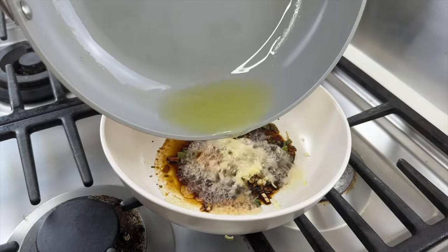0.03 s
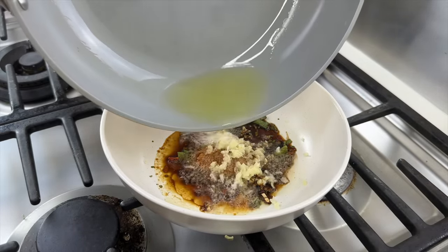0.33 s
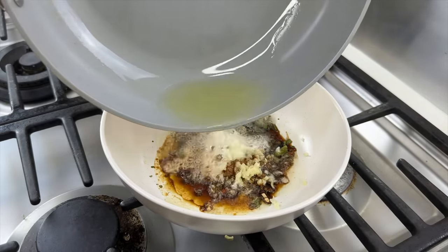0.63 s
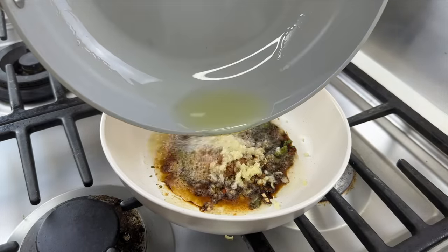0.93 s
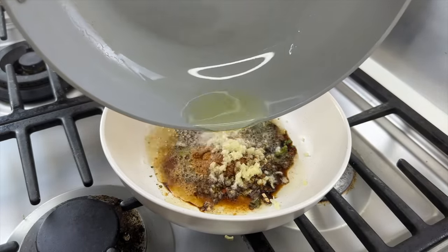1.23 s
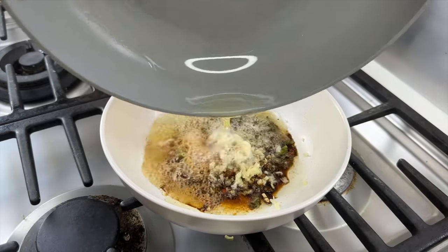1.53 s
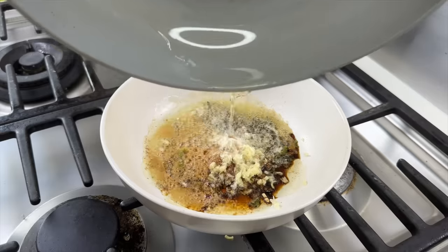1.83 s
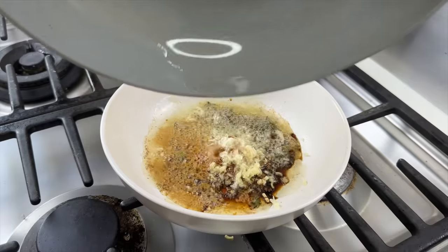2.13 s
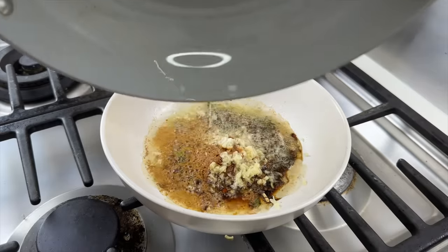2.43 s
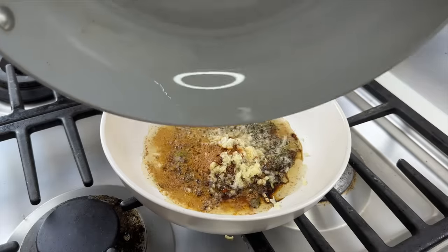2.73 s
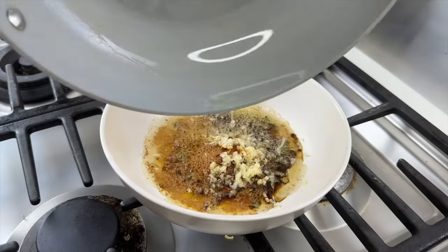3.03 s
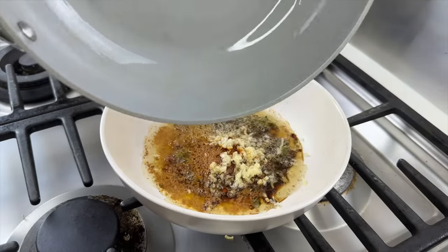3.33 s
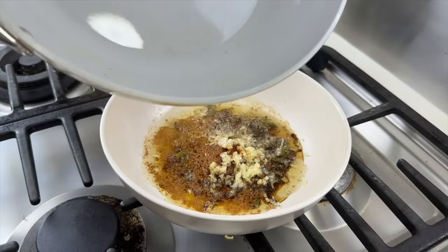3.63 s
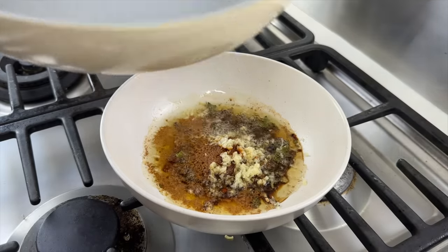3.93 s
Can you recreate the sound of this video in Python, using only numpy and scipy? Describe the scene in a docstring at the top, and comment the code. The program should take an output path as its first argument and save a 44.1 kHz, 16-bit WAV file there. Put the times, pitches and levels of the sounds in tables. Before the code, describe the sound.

A sharp sizzle of poured hot oil, spitting and popping, then fizzing more softly.

```python
"""Hot oil is poured from a pan over seasonings in a ceramic bowl, in a kitchen where an appliance hums.
At once water flashes to steam in tiny bursts: a high fizz and a crackle, then a swelling coarse sputter.
The bowl's resonances colour all three, and the gap under the tipping pan colours the lower two.
Droplets spit in bright snaps; steam pockets pop, coloured by the bowl's resonances.
The sputter dies first, the pops thin out and the foam fizzes on."""
import sys
import numpy as np
from scipy import signal
from scipy.fft import rfft, irfft, next_fast_len
from scipy.io import wavfile
from scipy.ndimage import map_coordinates

SR = 44100
rng = np.random.default_rng(int(sys.argv[2]) if len(sys.argv) > 2 else 0)


def wrap_up_sound(samples):
    """Save the sound to the file named by the first command line argument, as 16-bit audio."""
    columns = np.atleast_2d(samples).T
    # keep every value between -1 and 1, then stretch to whole-number steps
    tamed = np.clip(columns, -1, 1)
    steps = np.round(tamed * 32767).astype(np.int16)
    wavfile.write(sys.argv[1], SR, steps)


N = 176400


def amp(db):
    """Amplitude ratio of a level in decibels."""
    return 10 ** (np.asarray(db) / 20)


def unit(x):
    """Normalisation to rms 1."""
    return x / np.sqrt(np.mean(x ** 2) + 1e-20)


def along(points, hz):
    """Interpolation of (frequency_hz, value) rows on a logarithmic frequency axis."""
    knots_hz, values = np.transpose(points)
    return np.interp(np.log(hz + 1), np.log(knots_hz + 1), values)


def curve(rows):
    """Linear interpolation of (time_s, value) rows, one value per sample."""
    return np.interp(np.arange(N) / SR, *np.transpose(rows))


def wobble(rate_hz):
    """Smooth random modulation: a spline through rate_hz Gaussian knots a second."""
    knots = rng.standard_normal(int(N * rate_hz / SR) + 4)
    return map_coordinates(knots, [np.arange(N) * rate_hz / SR])


def bell(hz, centre_hz, width_hz):
    """Lorentzian resonance curve, 1 at its centre."""
    return 1 / (1 + (2 * (hz - centre_hz) / width_hz) ** 2)


def filtered(x, response):
    """Linear filtering: the spectrum of x is multiplied by response(hz)."""
    size = 2 * next_fast_len(N // 2 + SR // 4)
    return irfft(rfft(x, size) * response(np.fft.rfftfreq(size, 1 / SR)), size)[..., :N]


def minimum_phase(db):
    """The causal response with these gains, obtained by folding the cepstrum."""
    cepstrum = irfft(np.log(amp(db)))
    half = len(cepstrum) // 2
    return np.exp(rfft(np.r_[cepstrum[0], 2 * cepstrum[1:half], np.zeros(half)]))


def add(track, start_s, sound):
    """Superposition of a sound on the track from start_s."""
    part = track[:, max(0, round(start_s * SR)):][:, :sound.shape[1]]
    part += sound[:, :part.shape[1]]


def widen(pair):
    """Partial coherence: mid and side become left and right, narrowing to nearly mono at 11-13 kHz."""
    # Left-right likeness: frequency_hz, coherence
    coherence = [(100, .97), (500, .75), (1600, .85), (2300, .78), (2900, .45), (4000, .58), (5500, .15),
                 (7000, .5), (8000, .82), (11100, .98), (13000, .97), (15000, .85)]

    def weights(hz):
        angle = np.arccos(np.clip(along(coherence, hz), -1, 1)) / 2
        return np.array([np.cos(angle), np.sin(angle)])

    mid, side = filtered(pair, weights)
    return np.array([mid + side, mid - side])


def appliance(air_db=-52):
    """A motor hums in two tones with slight phase modulation, over the broadband rumble of air."""
    # Motor tones: pitch_hz, level_db
    tones = [(96.3, -55), (127, -59.5)]
    # Spectrum of the air: frequency_hz, gain_db
    rumble = [(20, -21), (35, -13), (60, -0.5), (78, 0), (97, 0.5), (125, -1), (165, -6.5), (300, -15),
              (600, -20.5), (2000, -31)]
    t = np.arange(N) / SR
    hum = sum(amp(db) * np.sqrt(2) * np.sin(2 * np.pi * hz * t + .5 * wobble(4.6)) for hz, db in tones)
    air = unit(filtered(rng.standard_normal((2, N)), lambda hz: amp(along(rumble, hz))))
    return hum + amp(air_db) * widen(air)


def bowl_db(hz):
    """Cavity resonance: the gain in decibels that the hollow of the bowl gives each frequency."""
    # Peaks and one dip of the bowl: centre_hz, width_hz, gain_db
    resonances = [(300, 100, 1.5), (1560, 280, 7), (2310, 150, 2.5), (2730, 320, -5), (3080, 220, 4.5),
                  (3730, 380, 3.5), (6060, 300, 1)]
    return sum(db * bell(hz, centre, width) for centre, width, db in resonances)


def bursts(spectrum, rate_hz, spread_db, clump_db, echo, echo_t60_s):
    """Shot noise: random steam bursts of log-normal size and their brief echoes excite the bowl; rms 1."""
    size_db = spread_db * np.minimum(rng.standard_normal(N), 2.76)
    clumping_db = clump_db * unit(wobble(140) + .51 * wobble(35.05))
    clicks = (rng.random(N) < rate_hz / SR) * amp(size_db + clumping_db) * rng.choice([-1, 1], N)
    energy_decay = amp(-60 * np.arange(SR // 25) / SR / echo_t60_s) ** 2
    echo_energy = signal.oaconvolve(clicks ** 2, energy_decay / energy_decay.sum())[:N]
    mid, side = np.sqrt(np.abs(echo_energy)) * rng.standard_normal((2, N))
    pair = np.array([clicks + echo * mid, np.hypot(1, echo) * side])
    return unit(filtered(pair, lambda hz: minimum_phase(along(spectrum, hz) + bowl_db(hz))))


def ring_colour(hz, low_cut_hz=616):
    """Response for bubbles and pops: the bowl's resonances at half their decibels, and a high-pass."""
    return minimum_phase(.5 * bowl_db(hz)) * (1j * hz / (low_cut_hz + 1j * hz)) ** 2


def bubbles(count=900, centre_hz=4300, spread_octaves=.6, spread_db=4.5, t60_cycles=10):
    """Damped oscillation: each middling bubble bursts with a brief tick at its own pitch; rms 1."""
    t = np.arange(SR // 100) / SR
    when, place = rng.random((2, count, 1))
    hz = centre_hz * 2 ** (spread_octaves * rng.uniform(-1, 1, (count, 1)))
    size_db = spread_db * np.clip(rng.standard_normal((count, 1)), -2, 2)
    rings = amp(size_db - 60 * t * hz / t60_cycles) * np.sin(2 * np.pi * hz * t)
    samples = ((when * N).astype(int) + np.arange(len(t))).ravel()
    pair = np.array([np.bincount(samples, (rings * gain).ravel(), N)[:N] for gain in (1, 2 * place - 1)])
    return unit(filtered(pair, ring_colour))


def under_pan(pair, peak_width_hz=290, notch_above_hz=380, notch_width_hz=230):
    """A resonance of the air gap, and an antiresonance above it, move as the pan tips; rms 1."""
    # Air gap between pan and bowl: time_s, resonance_hz, lift_db, notch_db
    gap = [(0, 980, -4, -16), (.3, 1250, 6.5, -0.5), (.7, 1250, 6, -0.5), (1.2, 860, 4.5, -6),
           (1.8, 890, 7, -12), (2.1, 910, 8, -8), (2.5, 1005, 7, -2), (2.95, 910, 6, -6),
           (3.3, 1050, 1.5, 0), (4, 1020, -0.5, 0)]
    hz, t, spectra = signal.stft(pair, SR, nperseg=512)
    time_s, *columns = np.transpose(gap)
    centre_hz, lift_db, notch_db = [np.interp(t, time_s, column) for column in columns]
    gain_db = lift_db * bell(hz[:, None], centre_hz, peak_width_hz)
    gain_db += notch_db * bell(hz[:, None], centre_hz + notch_above_hz, notch_width_hz)
    return unit(signal.istft(spectra * amp(gain_db), SR, nperseg=512)[1][:, :N])


def sizzle():
    """Flash boiling: coarse, medium and fine bubbles burst, the finer ones higher and for longer."""
    # Envelopes of the three bubble sizes: time_s, relative_level_db
    sputter_levels = [(0, -42), (.22, -48), (.32, -38), (.54, -31.5), (.61, -33.5), (.68, -28), (.77, -33),
                      (.92, -34), (1.08, -37), (1.22, -32), (1.42, -33), (1.64, -40), (2.3, -43),
                      (2.85, -45.5), (3.15, -47.5), (3.8, -49), (4, -45.5)]
    crackle_levels = [(0, -34.5), (.21, -44), (.29, -39), (.345, -32), (.41, -27.5), (.53, -27),
                      (.62, -30.5), (.7, -27.5), (.8, -29.5), (1.12, -32.5), (1.2, -30.5), (1.65, -29),
                      (2.25, -34), (2.87, -38), (3.2, -41), (3.63, -39.5), (3.85, -42), (4, -40)]
    fizz_levels = [(0, -31.5), (.19, -35.5), (.53, -28.5), (.68, -30.5), (1.1, -31.5), (1.5, -32.5),
                   (1.66, -31.5), (2.3, -32), (3.1, -35), (3.33, -37), (3.65, -36), (4, -36.5)]
    # Their spectra ahead of the bowl's resonances: frequency_hz, gain_db
    sputter_spectrum = [(100, -27.5), (200, -13.5), (300, -13), (520, -17), (750, -9), (1100, -7),
                        (1600, -4), (2300, -4.5), (2900, -6.5), (4500, -19), (9000, -57)]
    crackle_spectrum = [(800, -19.5), (2000, -14), (3000, -3.5), (4400, 1.5), (5300, 2), (6400, 0.5),
                        (7600, 1.5), (9000, -6.5), (12000, -14), (16000, -46)]
    fizz_spectrum = [(1500, -27), (4000, -13.5), (7000, -4.5), (8500, -1.5), (10100, -2), (11100, .8),
                     (12500, -2.5), (14500, -2.5), (16000, -2.5)]
    sputter = bursts(sputter_spectrum, 2400, spread_db=5.5, clump_db=1.53, echo=.7, echo_t60_s=.025)
    sputter = under_pan(sputter) * amp(curve(sputter_levels) + .2)
    crackle = bursts(crackle_spectrum, 5000, spread_db=5, clump_db=1, echo=.84, echo_t60_s=.0074)
    crackle = under_pan(crackle + amp(-9) * bubbles()) * amp(curve(crackle_levels) + .36)
    fizz = bursts(fizz_spectrum, 5000, spread_db=5, clump_db=.33, echo=.64, echo_t60_s=.024)
    return sputter + crackle + fizz * amp(curve(fizz_levels) + 3.35)


def spits(t60_s=.0044, low_cut_hz=6000):
    """Impulsive sources: droplets explode in very short, bright snaps of noise."""
    # Exploding droplets: start_s, relative_level_db
    droplets = [(0.24, -14), (.446, -7.5), (.485, -5.5), (.522, -5), (.539, -11), (.545, -7), (.583, -10),
                (.629, -10), (.72, -13), (.79, -10), (.842, -11), (1.035, -11), (2.056, -15), (2.198, -13),
                (2.592, -15), (2.874, -15), (3.967, -20)]
    track, t = np.zeros((2, N)), np.arange(SR // 50) / SR
    for start_s, db in droplets:
        snap = amp(db - 60 * t / t60_s) * rng.standard_normal((2, len(t)))
        add(track, start_s, snap * [[1], [.5]])  # more mid than side
    return filtered(track, lambda hz: 1j * hz / (low_cut_hz + 1j * hz))


def scatter(t60_s=.028):
    """Early reflections: mid and side impulse responses of direct sound and echoes off bowl and pan."""
    t = np.arange(SR // 25) / SR
    echoes = rng.standard_normal((2, len(t))) * amp(-60 * t / t60_s)
    paths = echoes / np.linalg.norm(echoes, axis=1, keepdims=True) * [[1], [np.sqrt(2)]]
    paths[0, 0] += 1  # direct path
    return paths


def pops(t60_cycles=6.5, attack_s=.00012, crack=.36, gain_db=-5):
    """Free decay: each steam pocket rings for a few cycles, with a faint crack as its skin tears."""
    # Bursting steam pockets: start_s, relative_level_db, pitch_hz
    pockets = [(.297, -15, 1480), (.35, -13.5, 3070), (.397, -7, 3040), (0.41, -10, 3300),
               (.453, -8.5, 2800), (.428, -8, 2970), (.519, -5.5, 3100), (.523, -17, 1600),
               (0.553, -16, 1480), (.573, -6.5, 3900), (.646, -12, 2290), (0.672, -8, 1210),
               (.677, -15, 1600), (.686, -14, 1380), (.909, -17.5, 1180), (.932, -10, 3500),
               (1.034, -12, 3480), (1.173, -10.5, 3600), (1.197, -9.5, 1900), (1.228, -9, 1750),
               (1.297, -9.5, 2000), (1.303, -16, 2310), (1.321, -10, 1500), (1.39, -7, 2350),
               (1.414, -9.5, 1990), (1.418, -15, 2200), (1.424, -15, 960), (1.436, -8.5, 3050),
               (1.445, -20, 1080), (1.512, -16, 1700), (1.531, -6.5, 3950), (1.535, -11.5, 1580),
               (1.554, -20, 1600), (1.563, -11, 3400), (1.6, -18, 1400), (1.731, -9, 3050),
               (1.953, -14, 3740), (2.005, -12, 3700), (2.175, -14.5, 2660), (2.225, -9.5, 3500),
               (2.278, -8.5, 4440), (2.346, -22, 1400), (2.415, -11.5, 3700), (2.585, -18, 3900),
               (2.663, -14, 3550), (2.783, -23, 1240), (2.787, -17, 4100), (2.881, -22, 1620),
               (3.015, -16, 5100), (3.044, -9, 4200), (3.077, -15, 3850), (3.249, -25, 1180),
               (3.389, -23, 3700), (3.618, -19, 3900), (3.635, -18, 4550), (3.967, -20.5, 1710)]
    track, t = np.zeros((2, N)), np.arange(SR // 50) / SR
    for start_s, db, hz in pockets:
        envelope = amp(-60 * t * hz / t60_cycles) * (1 - np.exp(-t / attack_s))
        ring = np.sin(2 * np.pi * hz * t) + crack * rng.standard_normal(len(t))
        ring *= amp(db + gain_db) * envelope / envelope.max()
        add(track, start_s, signal.fftconvolve(ring[None], scatter(), axes=1))
    return filtered(track, ring_colour)


def kitchen(x):
    """Reverberation: a short diffuse tail that dulls as the treble decays fastest."""
    # Reverberation times of the room: frequency_hz, t60_s
    decay_times = [(200, 0.21), (2000, 0.23), (12000, 0.083)]
    hz, t, spectra = signal.stft(rng.standard_normal((2, SR // 3)), SR, nperseg=256)
    decay = amp(-60 * t / along(decay_times, hz)[:, None])
    tail = signal.istft(spectra * decay, SR, nperseg=256)[1]
    return signal.fftconvolve(x, tail / np.linalg.norm(tail[0]), axes=1)[:, :N]


def scene(room_db=-11.5):
    """Superposition of the oil's direct sound, its reverberation and the appliance."""
    oil = widen(sizzle() + pops() + spits())
    return oil + amp(room_db) * kitchen(oil) + appliance()


def record(dry, top_hz=15820):
    """Stereo imaging: left-right level and phase vary with frequency, up to a band limit."""
    # Level of left over right: frequency_hz, balance_db
    balance = [(90, .3), (750, 3), (1400, 2), (2200, 0), (3200, 1.8), (4400, 1.3), (5600, 4.2), (7200, 2),
               (8500, 2.4), (10300, 0)]
    # Phase of left ahead of right: frequency_hz, lead_rad
    lead = [(2300, 0), (2750, 1.1), (4100, 1.1), (5400, -.3), (6400, .1), (7200, 1.9), (8000, 2.6),
            (9300, 1.3), (11100, 0), (13000, 0), (13400, -.8), (16000, -2.2)]
    sides = np.array([[.5], [-.5]])

    def response(hz):
        return amp(sides * along(balance, hz)) * np.exp(1j * sides * along(lead, hz)) * (hz < top_hz)

    return filtered(dry, response)


dry = scene()
out = record(dry)
wrap_up_sound(out)
```